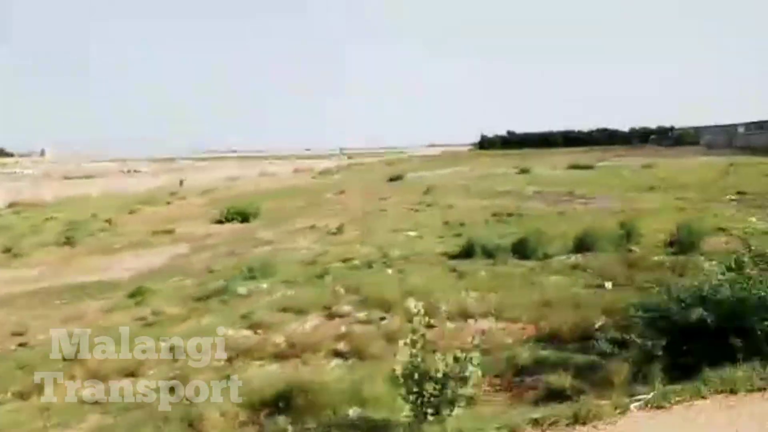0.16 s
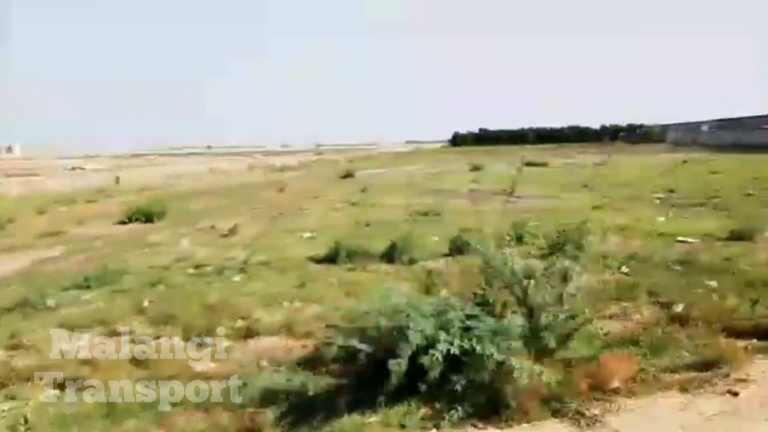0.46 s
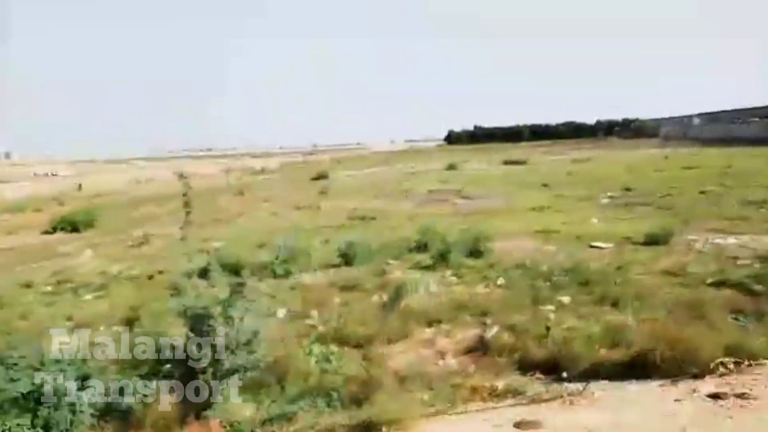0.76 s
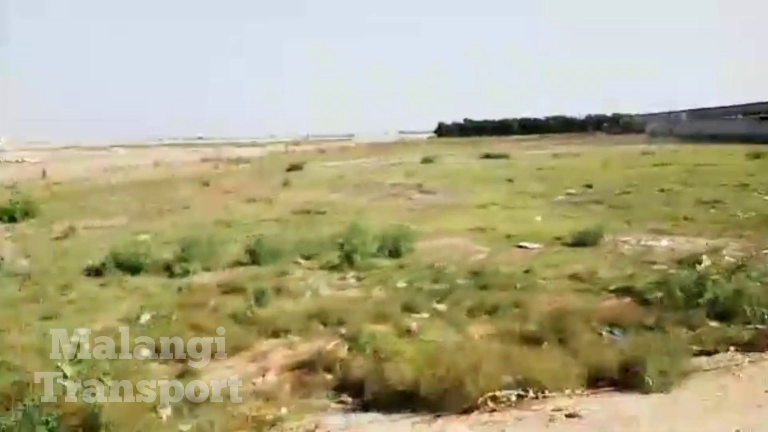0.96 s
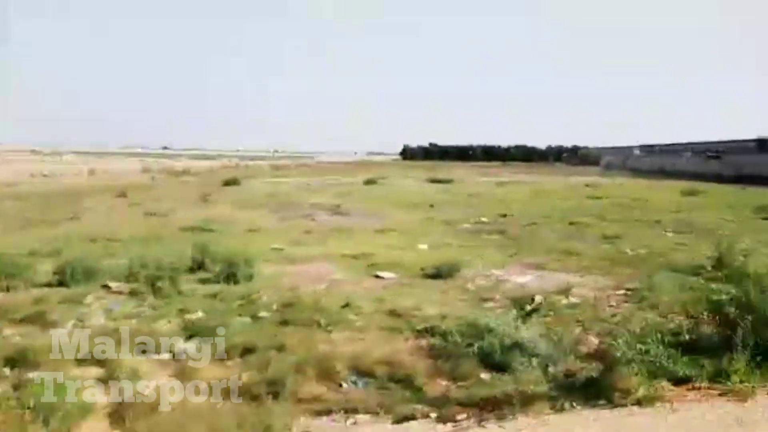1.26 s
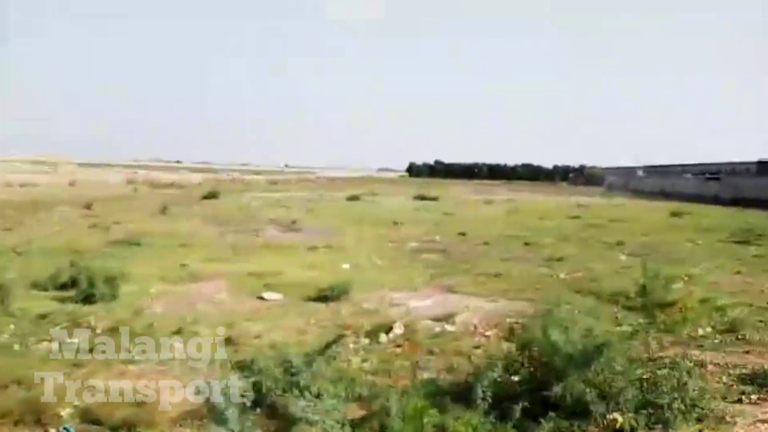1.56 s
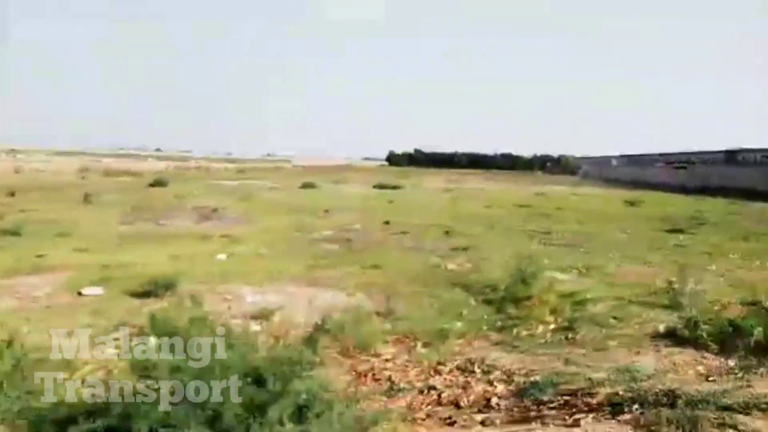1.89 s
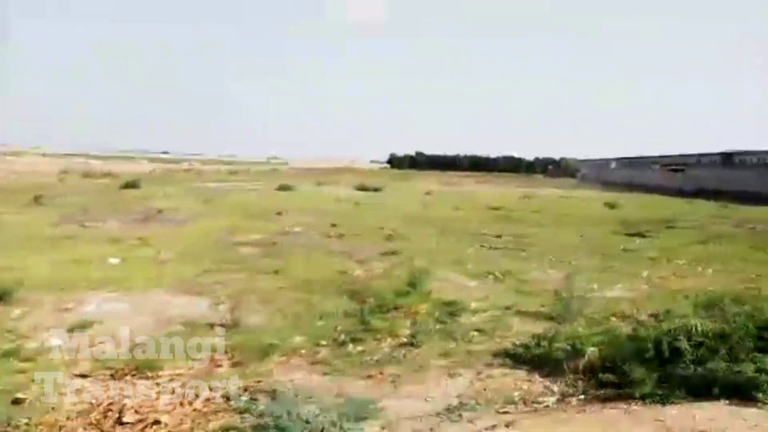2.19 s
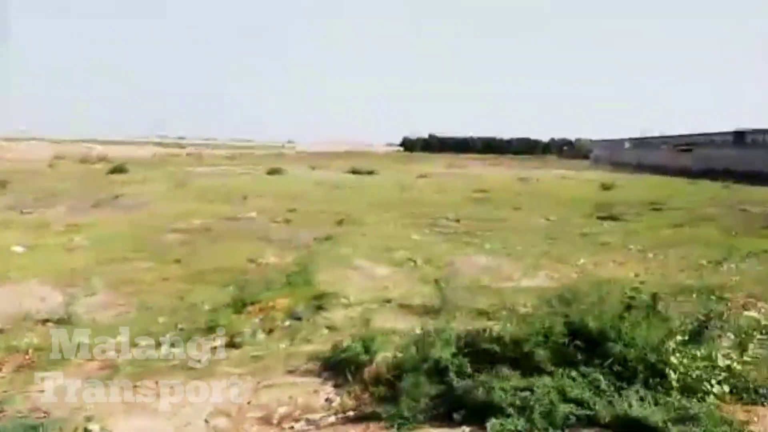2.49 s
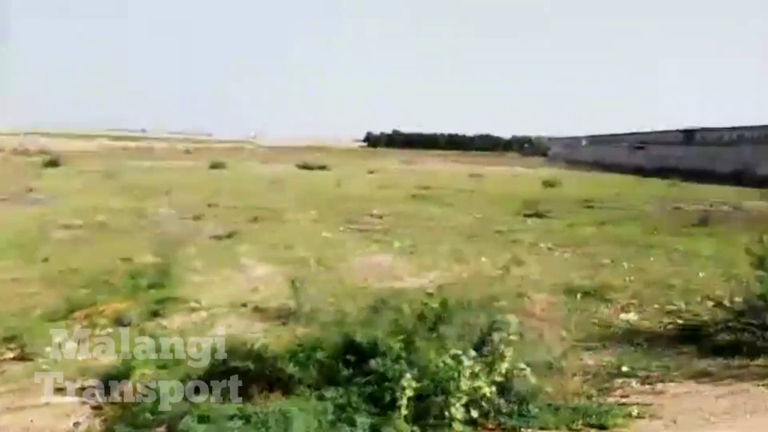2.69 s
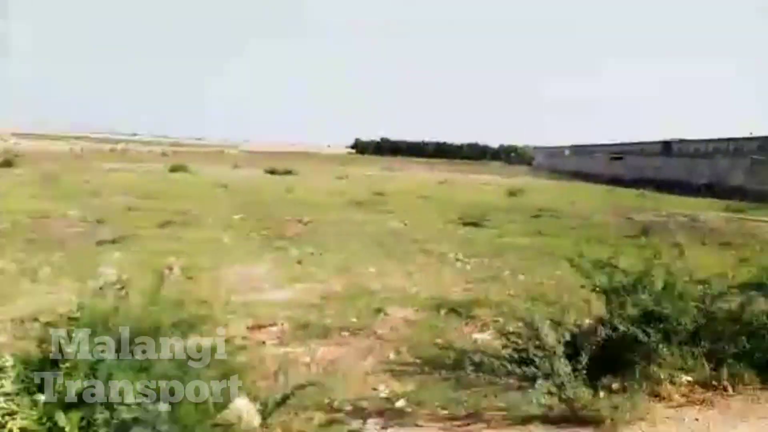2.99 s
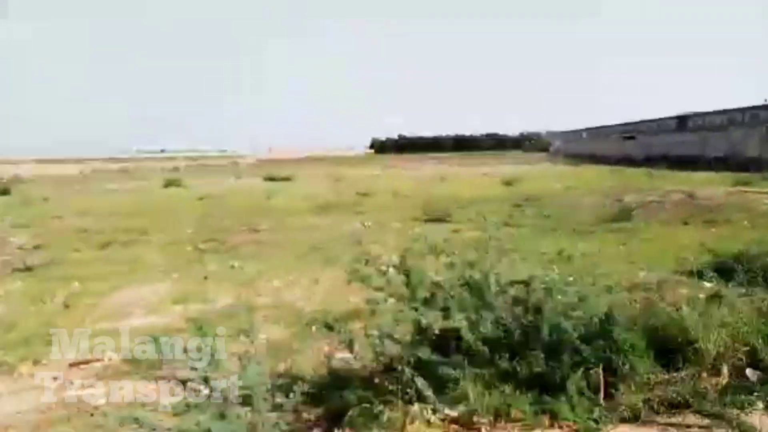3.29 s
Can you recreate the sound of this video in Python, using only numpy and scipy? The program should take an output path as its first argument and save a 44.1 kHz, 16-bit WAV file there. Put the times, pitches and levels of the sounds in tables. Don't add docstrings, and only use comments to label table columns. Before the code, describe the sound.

A truck's air horn gives two quick, dissonant, fluttering honks near the end; before it a clattering diesel pulls, then eases off into tyre and wind roar, heard through a hand-held phone at the open window.

```python
import sys
import numpy as np
from scipy import signal
from scipy.fft import rfft, irfft
from scipy.io import wavfile
from scipy.ndimage import uniform_filter1d

SR = 44100
rng = np.random.default_rng(int(sys.argv[2]) if len(sys.argv) > 2 else 0)


def to_linear_factor(level_db):
    exponent = np.asarray(level_db, float) / 20
    return 10 ** exponent


def put_to_file(sound):
    columns = np.atleast_2d(sound).T
    safe = np.clip(columns, -1, 1)
    whole_steps = np.round(safe * 32767)
    wavfile.write(sys.argv[1], SR, whole_steps.astype(np.int16))


N = 152145


def level(x, db):
    return x * to_linear_factor(db) / np.sqrt(np.mean(x ** 2))


def curve(table, column=1):
    points = np.array(table, float)
    return np.interp(np.arange(N) / SR, points[:, 0], points[:, column])


def walk(rate):
    hold = int(SR / rate)
    steps = np.repeat(rng.standard_normal(N // hold + 1), hold)[:N]
    smooth = uniform_filter1d(uniform_filter1d(steps, hold), hold)
    return smooth / smooth.std()


def band(x, hz, width):
    return signal.lfilter(*signal.iirpeak(hz, hz / width, fs=SR), x)


def steep_band(x, hz, width):
    return band(band(x, hz, width), hz, 2 * width)


def hump(t, start, length):
    return np.sin(np.pi * np.clip((t - start) / length, 0, 1))


def coloured(spectrum, flicker_db, rate):
    points, hz = np.array(spectrum, float), np.arange(1, N // 2 + 2) * SR / N
    colour = to_linear_factor(np.interp(np.log(hz), np.log(points[:, 0]), points[:, 1]))
    noise = rfft(rng.standard_normal(N)) * colour
    place = 2 * np.log2(hz / 20)
    out = np.zeros(N)
    for k in range(20):
        share = np.clip(1 - abs(place - k), 0, 1)
        out += irfft(noise * share, N) * to_linear_factor(flicker_db * walk(rate))
    return level(out, 0)


# (time [s], level [dB])
ENGINE_LOAD = [(0, -0.5), (.3, -1), (.7, 0), (1.07, -0.5), (1.12, -11.5), (1.2, -15), (1.5, -37),
               (3.45, -46)]
# (time [s], rate [Hz])
FIRING_RATE = [(0, 65.07), (.3, 66.64), (.7, 67.7), (1.1, 66.85), (1.4, 62.4), (3.45, 55.4)]
# (multiple of the firing rate, level [dB])
EXHAUST_ORDERS = [(1, -38), (2, -52), (3, -53), (3.5, -48), (5, -51), (6, -54)]
# (frequency [Hz], density [dB per Hz])
CLATTER_COLOUR = [(450, -22), (900, -7.5), (1350, -1.5), (1800, -9.5), (2750, -15), (3500, -24.5),
                  (5800, -28.5), (15500, -38)]
# (time [s], frequency [Hz], level [dB])
TURBO_WHISTLE = [(0, 4110, -53), (.7, 4090, -51.5), (1.04, 4070, -51), (1.1, 3800, -54), (1.135, 3450, -57),
                 (1.17, 3337, -73)]
# (time [s], frequency [Hz], level [dB])
GEAR_HUM = [(0, 277, -36.5), (.45, 280, -40), (.56, 283.8, -60), (.68, 277, -37.5), (1.1, 280.9, -41),
            (1.3, 267.2, -45.5), (2.0, 270, -42.5), (3.45, 263.4, -51)]


def engine():
    turns = np.cumsum(curve(FIRING_RATE) * (1 + 0.0016 * walk(3.6))) / SR
    exhaust = np.zeros(N)
    for order, db in EXHAUST_ORDERS:
        unsteady_db = min(order - .4, 2.5) * walk(11.6)
        exhaust += to_linear_factor(db + 3 + unsteady_db) * np.sin(2 * np.pi * order * turns + order * order)
    knock = 1 + 0.092 * np.cos(2 * np.pi * turns)
    clatter = coloured(CLATTER_COLOUR, 0.38, 13.8) * knock
    block = steep_band(clatter, 1370, 62) * to_linear_factor(3.6 * walk(39.3))
    combustion = exhaust + level(clatter, -36.5) + level(block, -52)
    return to_linear_factor(curve(ENGINE_LOAD)) * combustion + turbo() + gearbox()


def turbo():
    whirl = np.cumsum(curve(TURBO_WHISTLE) * (1 + .015 * walk(25))) / SR
    whistle = walk(950) * np.sin(2 * np.pi * whirl) * to_linear_factor(.6 * walk(42))
    return level(whistle, 0) * to_linear_factor(curve(TURBO_WHISTLE, column=2))


def gearbox():
    mesh = np.cumsum(curve(GEAR_HUM) + 7.5 * walk(16)) / SR
    return to_linear_factor(curve(GEAR_HUM, column=2) + 7.5 + 1.9 * walk(10.9)) * np.sin(2 * np.pi * mesh)


VALVE_OPEN = [2.517, 2.586, 2.666, 2.734, 2.797, 2.864, 2.929, 2.994, 3.061, 3.124, 3.19]
# (valve lag [turns], flutter [dB], pitch bend [share], bend lag [turns])
TRUMPET_FLUTTER = [(.4, 3, .007, .1), (.2, 4, .008, .1), (.02, 2, .012, .01), (.02, 2, .007, .01),
                   (.45, 5, .009, .4), (.45, 6, .008, .2), (.02, 4, .006, .01)]
TRUMPET_PARTIALS = [(-19, 4.5, -2, 4, -20), (-1, 0, 3, -3, -11), (-5, 0.5, -3.5, 1.5, 0),
                    (0, -12, -1.5, -6.5, -13), (-13, -2, 6.5, -1.5, -6.5), (-5, 3, -10, 1.5, -1),
                    (-1.5, -9, -26, -14, -17)]
# (start [s], stop [s], pitch [Hz], level [dB], brightness [dB per octave])
TRUMPET_PUFFS = [
    [(2.55, 2.745, 326.1, -36, 4), (2.80, 3.065, 323.8, -31, -1.6)],
    [(2.55, 2.70, 362.6, -29, -2), (2.83, 3.09, 365.9, -32.5, -0.3)],
    [(2.555, 2.71, 387, -27.5, -2.1), (2.835, 3.05, 387, -31, -0.06), (3.055, 3.09, 385, -28.5, 0)],
    [(2.553, 2.70, 441.5, -26, 0.9), (2.705, 2.757, 437, -25.5, 4), (2.815, 3.06, 441.5, -26, 1.36)],
    [(2.55, 2.715, 488, -30, -2.1), (2.797, 3.045, 490.6, -31, -0.66)],
    [(2.56, 2.71, 581, -32.5, -4.5), (2.81, 2.85, 575, -30.5, -2), (2.865, 3.06, 579, -32, -4.5)],
    [(2.555, 2.7, 397, -29, 0.5), (2.835, 3.07, 397, -28.5, 2.5), (3.085, 3.115, 397, -31.5, -5)],
]


def horn():
    first = int(2.45 * SR)
    t = np.arange(first, N) / SR
    valve = 2 * np.pi * np.interp(t, VALVE_OPEN, np.arange(len(VALVE_OPEN)))
    reeds, blowing = np.zeros(len(t)), np.zeros(len(t))
    for puffs, flutter, partials in zip(TRUMPET_PUFFS, TRUMPET_FLUTTER, TRUMPET_PARTIALS):
        lag, flutter_db, bend, bend_lag = flutter
        pitch_bend = bend * np.cos(valve - 2 * np.pi * bend_lag) + .008 * walk(120)[first:]
        wobble = np.cumsum(pitch_bend) / SR
        pressure = np.cos(valve - 2 * np.pi * lag)
        shimmer_db, grit_db = 0.5 * walk(50)[first:], 2.4 * walk(350)[first:]
        swell_db = flutter_db * pressure + shimmer_db + grit_db
        for start, stop, hz, db, bright_db in puffs:
            attack = np.clip((t - start) / .014 + .5, 0, 1) ** 2
            gate = attack * np.exp(-np.clip(t - stop, 0, 1) / .022 * 2)
            on = gate > 1e-3
            loose = min((stop - start) / .15, 1)
            tone = trumpet(hz, (t + loose * wobble)[on], pressure[on], partials, bright_db, loose)
            reeds[on] += (to_linear_factor(db + 3 + swell_db) * gate)[on] * tone
            blowing += gate / len(TRUMPET_PUFFS)
    air = level(band(rng.standard_normal(len(t)), 7900, 6000), -38.5) * to_linear_factor(4 * np.cos(valve))
    rasp = level(band(rng.standard_normal(len(t)), 1200, 1500), -38.5)
    return np.r_[np.zeros(first), reeds + np.sqrt(blowing) * air + blowing * rasp]


def trumpet(hz, bent_time, pressure, partials, bright_db, loose):
    k = np.arange(1, int(15000 / hz))
    octaves = np.log2(k[5:] / 5)
    floor_db = -39 + 20 * (1 - loose) - 5 * octaves
    upper = np.maximum(partials[-1] - 18.5 * octaves, floor_db)
    waves = np.sin(k[:, None] * 2 * np.pi * hz * bent_time + k[:, None] ** 2)
    hold = SR // 110
    steps = np.repeat(rng.standard_normal((20, 70)), hold, axis=1)[:, :len(bent_time)]
    depth = .6 * loose * np.minimum(k[:20, None] / 6, 1)
    waves[:20] *= 1 + depth * uniform_filter1d(steps, hold, axis=1)
    waves[0] *= to_linear_factor(3 * pressure)
    return to_linear_factor(np.r_[partials, upper] + bright_db * np.log2(np.minimum(k, 6))) @ waves


def roadside_echo(honk):
    lag = np.arange(SR // 2) / SR
    scatter = rng.standard_normal(len(lag)) * to_linear_factor(-60 * lag / 0.97)
    scatter *= np.clip(lag / 0.028, 0, 1) * (0.6 + 1 / (1 + (lag / 0.2) ** 12))
    bright = signal.lfilter([1, -0.86], 1, honk)
    thin = level(foliage_band(bright), 0) * honk.std() * walk(260)
    scatter /= np.sqrt(np.sum(scatter ** 2))
    return signal.fftconvolve(thin, scatter)[:N] * to_linear_factor(-15.5)


def foliage_band(x):
    return band(x, 2530, 4930)


# (time [s], frequency [Hz], level [dB])
BRAKE_SQUEAL = [(2.235, 6140, -62), (2.25, 6110, -54), (2.295, 6060, -59), (2.31, 6090, -48),
                (2.34, 6070, -49), (2.355, 6100, -62), (2.39, 6200, -72), (2.415, 6260, -66),
                (2.435, 6250, -73), (2.46, 6230, -64), (2.485, 6150, -75), (2.53, 6100, -62),
                (2.575, 6080, -54)]
# (start [s], length [s], frequency [Hz], level [dB])
SQUEAL_SIDE_TONE = (2.33, .12, 5870, -64)


def brake():
    t = np.arange(N) / SR
    phase = 2 * np.pi * np.cumsum(curve(BRAKE_SQUEAL) * (1 + 0.00527 * walk(300))) / SR
    on = (t > BRAKE_SQUEAL[0][0]) & (t < BRAKE_SQUEAL[-1][0])
    tone = np.sin(phase) + to_linear_factor(-18) * np.sin(2 * phase)
    rough = 1 + to_linear_factor(-7) * walk(400)
    squeal = on * to_linear_factor(curve(BRAKE_SQUEAL, column=2) + 9) * tone * rough
    start, length, hz, db = SQUEAL_SIDE_TONE
    side = to_linear_factor(db) * hump(t, start, length) * np.sin(phase * hz / 6150)
    return squeal + side * (1 + .8 * walk(200))


# (time [s], peak level [dB], frequency [Hz], t60 [s])
TRIM_TICKS = [(1.1364, -40, 3800, 0.04), (1.1894, -41.5, 3300, 0.05), (1.567, -45, 6720, 0.063),
              (1.5883, -41.5, 6900, 0.063), (1.6064, -44, 8800, 0.072), (1.6354, -45, 8620, 0.05),
              (1.6945, -47, 4034, 0.055), (1.7862, -38, 8700, 0.12), (1.7868, -32, 14000, 0.04),
              (1.811, -36, 4470, 0.07), (1.8165, -30, 8080, 0.04), (1.8197, -30, 8500, 0.025),
              (1.824, -40, 7800, 0.09), (1.8846, -41.5, 8040, 0.081), (1.934, -40, 3340, 0.054),
              (2.0018, -46, 8640, 0.05), (2.095, -52, 8400, 0.04), (2.155, -50, 8200, 0.054),
              (2.2014, -48, 7800, 0.05), (2.31, -45, 6700, 0.1), (2.4137, -44.5, 8300, 0.05),
              (3.416, -41.5, 4720, 0.03), (3.3091, -43.5, 9170, 0.072)]
# (time [s], length [s], frequency [Hz], level [dB])
METAL_SQUEAKS = [
    (1.51, .02, 8000, -61),
    (2.32, 0.018, 3050, -62),
    (3.21, .022, 3700, -50),
    (3.21, .02, 7350, -63),
    (3.21, .022, 10700, -61),
]


def rattles():
    t, out = np.arange(N) / SR, np.zeros(N)
    noise = rng.standard_normal(N)
    for start, db, hz, t60 in TRIM_TICKS:
        fade = (t > start) * to_linear_factor(-60 * np.clip(t - start, 0, 1) / t60)
        fade *= np.clip((t - start) / .002, 0, 1)
        hiss = band(band(noise, hz, 0.39 * hz), hz, min(3.8 * hz, 15000))
        out += level(hiss, db - 4.5) * fade
    since_snap = t - 1.8208
    out += to_linear_factor(-23) * np.exp(-(since_snap / 0.00026) ** 2) * np.cos(2 * np.pi * 8000 * since_snap)
    for start, length, hz, db in METAL_SQUEAKS:
        squeak = hump(t, start, length) * np.sin(2 * np.pi * hz * t)
        out += to_linear_factor(db + 4) * squeak * (1 + 1.4 * walk(400))
    return out


# (frequency [Hz], density [dB per Hz])
ROAR_COLOUR = [(14, -20), (28, -7), (52, -19.5), (120, -8), (200, -8), (300, -6.5), (536, -13), (700, -16),
               (1500, -52.5)]
# (frequency [Hz], density [dB per Hz])
HISS_COLOUR = [(410, -57), (700, -1), (1010, -3.5), (1090, -1.5), (1220, -4), (1740, -8.5), (4780, -33.5),
               (8240, -29.5), (15600, -34.5)]
# (time [s], level [dB])
ROAD_LOUDNESS = [(0, -33), (.5, -31.5), (1.0, -32.5), (1.5, -33), (2.0, -33.5), (2.5, -33.5), (3.0, -30.5),
                 (3.45, -35.5)]
# (frequency [Hz], width [Hz], level [dB])
CAB_RESONANCES = [(235.5, 12.6, -43), (337.4, 8.6, -42), (429.6, 22.7, -41.5), (622, 23, -47.5)]


def road():
    roar = coloured(ROAR_COLOUR, 1.7, 7.15) + to_linear_factor(-7) * coloured(HISS_COLOUR, 2.2, 12.31)
    cab = np.zeros(N)
    for hz, width, db in CAB_RESONANCES:
        cab += level(steep_band(rng.standard_normal(N), hz, width), db + 32)
    return (roar + cab) * to_linear_factor(curve(ROAD_LOUDNESS))


# (time [s], length [s], level [dB])
WIND_GUSTS = [
    (1.38, .1, -44),
    (1.613, .12, -41.5),
    (1.858, 0.15, -45),
    (2.126, .12, -49),
    (2.648, 0.2, -48),
    (3.078, 0.2, -48),
]


def wind():
    t = np.arange(N) / SR
    gusts = sum(to_linear_factor(db) * np.exp(-((t - s) / length * 2) ** 2) for s, length, db in WIND_GUSTS)
    rumble = band(band(rng.standard_normal(N), 26, 40), 30, 60)
    return gusts * level(rumble, 0)


def scene():
    honk = horn()
    truck = engine() + brake() + rattles()
    return (truck + honk + roadside_echo(honk) + road() + wind())[None]


def band_limit(x):
    return signal.sosfilt(signal.butter(12, 15710, fs=SR, output="sos"), x)


def record(dry):
    dull = signal.sosfilt(signal.butter(2, 10950, fs=SR, output="sos"), dry)
    mix = np.tanh(1.033 * dull) / 1.187
    return band_limit(mix)


dry = scene()
out = record(dry)
put_to_file(out)
```